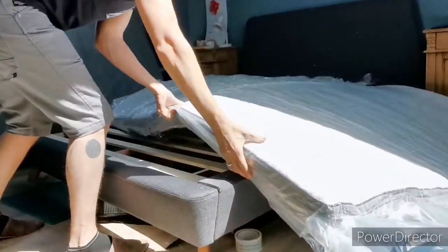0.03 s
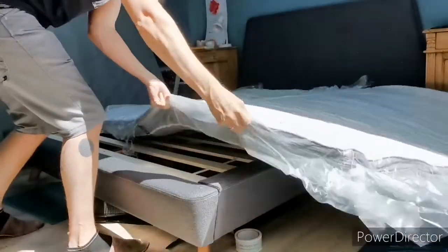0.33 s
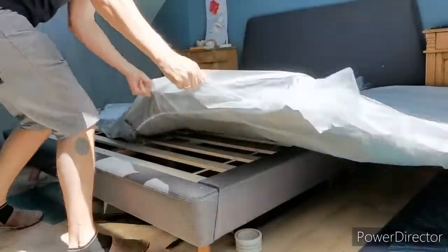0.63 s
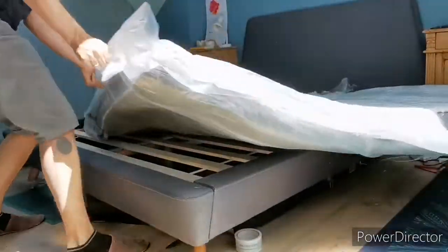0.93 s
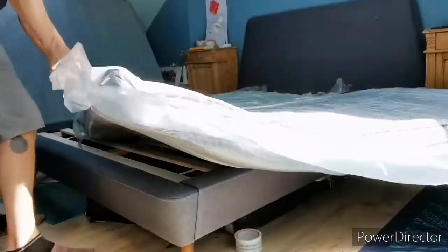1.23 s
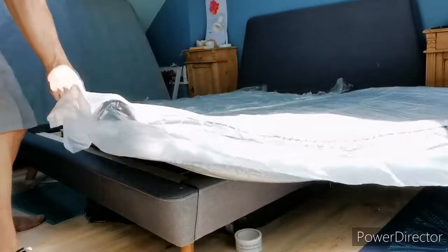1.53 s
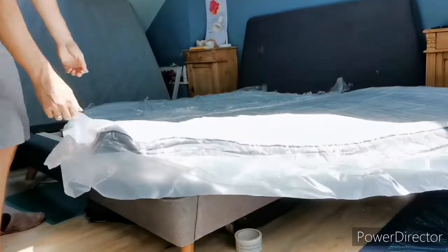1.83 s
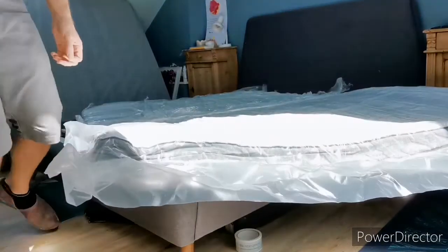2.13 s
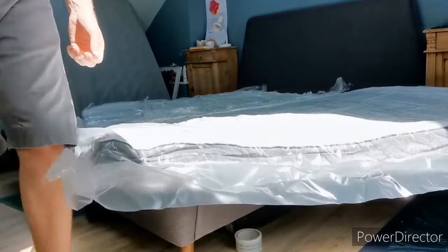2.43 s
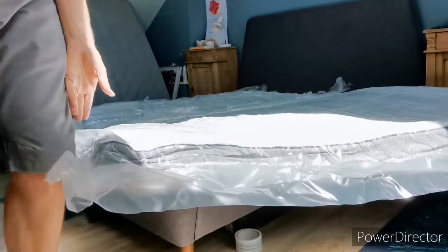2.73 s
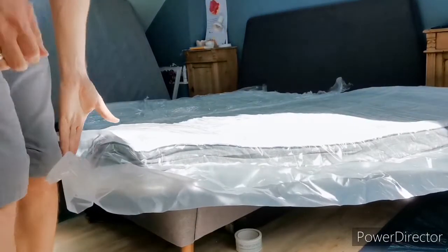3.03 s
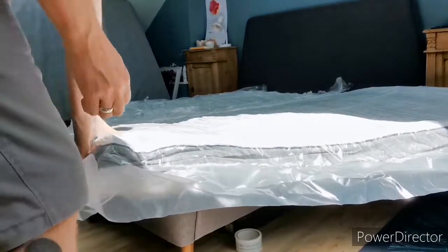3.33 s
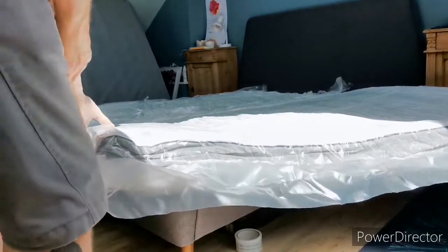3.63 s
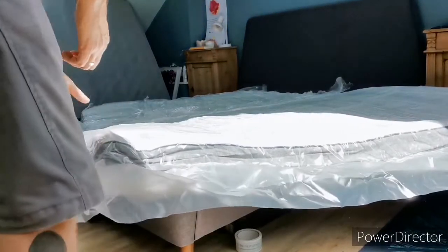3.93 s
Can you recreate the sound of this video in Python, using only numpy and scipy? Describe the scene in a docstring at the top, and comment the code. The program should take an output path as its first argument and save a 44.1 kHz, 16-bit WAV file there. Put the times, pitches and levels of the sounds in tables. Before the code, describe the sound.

Plastic crinkles and scrapes as a wrapped mattress is dragged, dropped with a thud and nudged.

```python
"""Loose plastic crinkles and scrapes: a mattress in its bag is dragged across a slatted bed frame.
The plastic crinkles in thousands of tiny buckles, snaps as big creases flip and groans as it rubs,
while the slats judder under the load. The mattress drops with a thud after about a second, then is
nudged into place with soft swishes as feet shift on the floor.
The room is a small, quiet bedroom, heard by a phone with two microphones."""
import sys
import numpy as np
from scipy import signal
from scipy.fft import rfft, irfft
from scipy.io import wavfile
from scipy.ndimage import uniform_filter1d, map_coordinates

SR = 44100
rng = np.random.default_rng(int(sys.argv[2]) if len(sys.argv) > 2 else 0)


def store_wav(level_fs):
    """Save 16-bit WAV to argv[1]."""
    pcm = np.round(np.clip(np.atleast_2d(level_fs), -1, 1) * 32767)
    wavfile.write(sys.argv[1], SR, pcm.T.astype(np.int16))


N = 176400
T = np.arange(N) / SR
TOP_HZ = 15800  # the highest pitch the phone picks up


def undb(db):
    """Turn decibels into a number to multiply by."""
    return 10 ** (np.asarray(db) / 20)


def unit(x):
    """Scale to an average strength (rms) of 1."""
    return x / np.sqrt(np.mean(x ** 2) + 1e-20)


def unit_energy(x):
    """Scale to a total energy of 1."""
    return x / np.sqrt(np.sum(x ** 2, axis=-1, keepdims=True) + 1e-20)


def curve(rows, column=1):
    """One column of a table, joined by straight lines in time."""
    rows = np.array(rows)
    return np.interp(T, rows[:, 0], rows[:, column])


def bell(middle, half_s):
    """A smooth swell and fade."""
    return np.exp(-.5 * ((T - middle) / half_s) ** 2)


def at_hz(points, hz):
    """Read between (frequency, value) points, giving each octave equal room."""
    points = np.array(points, float)
    return np.interp(np.log(np.maximum(hz, 1)), np.log(points[:, 0]), points[:, 1])


def shape(x, db_of, size=8192):
    """Turn each frequency up or down by db_of(frequency) decibels."""
    cepstrum = irfft(np.log(undb(db_of(np.fft.rfftfreq(size, 1 / SR)))))
    cepstrum[1:size // 2] *= 2  # folded so the filter rings after a sound, never before
    cepstrum[size // 2 + 1:] = 0
    return signal.fftconvolve(x, irfft(np.exp(rfft(cepstrum))))[:len(x)]


def colour(x, points):
    """Give a sound the tone drawn by (frequency [Hz], level [dB]) points."""
    return shape(x, lambda hz: at_hz(points, hz))


def add(out, start, x):
    """Mix a sound in at a time in seconds."""
    i = int(start * SR)
    out[i:i + len(x)] += x[:N - i]


def clicks(per_s, spread_db):
    """Random clicks; the wider the spread, the more a few stand out."""
    size = undb(spread_db * np.minimum(rng.exponential(size=N), 4.5))
    return (rng.random(N) < per_s / SR) * size * rng.choice([-1, 1], N)


# swishes as the bag settles and is handled
# (time [s], half length [s], treble [dB], mids [dB], scrape [dB])
SWISHES = [(1.644, 0.093, -59, -53, -55.5), (1.704, 0.037, -42.5, -46.5, -58),
           (1.827, 0.052, -54.5, -53.5, -56.5), (1.983, 0.051, -50, -55, -56), (2.36, 0.03, -58, -68, -62),
           (2.491, 0.029, -47, -58, -53.5), (2.606, 0.033, -51.5, -50.5, -53.5),
           (3.179, 0.015, -54.5, -61, -52), (3.415, 0.15, -56, -59, -62.5), (3.544, 0.052, -52.5, -52, -51),
           (3.589, 0.026, -48.5, -46.5, -47.5), (3.717, 0.046, -51, -50.5, -51.5),
           (3.832, 0.062, -63, -54.5, -54.5), (3.983, 0.049, -59.5, -63, -58)]


def motion(drag, column, swish_column, swish_db=0, release_s=0.042):
    """How strong one layer is over time: the long drag dies away, then short swishes follow."""
    dragged = undb(curve(drag, column)) * np.exp(-np.maximum(T - drag[-1][0], 0) / release_s)
    swish_power = sum((undb(row[swish_column] + swish_db) * bell(row[0], row[1])) ** 2 for row in SWISHES)
    return np.sqrt(dragged ** 2 + swish_power)


def buckles(per_s, spread_db, decay_s=0.00015, size=48):
    """Tiny buckles in the plastic, each a very short ring at its own pitch."""
    hits, hz = clicks(per_s, spread_db), rng.random(N) * SR / 2
    starts, age = np.flatnonzero(hits)[:, None], np.arange(size)
    rings = hits[starts] * np.exp(-age / SR / decay_s) * np.cos(2 * np.pi * hz[starts] * age / SR)
    return np.bincount((starts + age).ravel(), rings.ravel(), N + size)[:N]


# how loudly the bag crinkles during the drag (time [s], treble [dB], mids [dB])
DRAG_CRINKLE = [(0.0, -38, -42), (0.052, -41.5, -44.5), (0.186, -35.5, -38.5), (0.342, -37, -39),
                (0.404, -34.5, -34.5), (0.486, -45, -52), (0.635, -36, -35.5), (0.72, -36.5, -37.5),
                (0.78, -43.5, -50), (0.95, -41, -47), (1.12, -32.5, -32.5), (1.202, -47.5, -48.5),
                (1.26, -42, -42.5), (1.312, -51, -57), (1.342, -39, -39), (1.468, -37, -37),
                (1.56, -60.5, -99)]
# tone of the small buckles and of the larger ones (frequency [Hz], level [dB])
SMALL_BUCKLE_TONE = [(1500, -16.5), (3000, -5), (4300, 1), (5800, -0.5), (7000, 1.5), (7900, -3),
                     (9500, -2.5), (10800, 0), (12000, -5), (13900, -6), (15500, -7)]
LARGE_BUCKLE_TONE = [(500, -16.5), (1100, -1), (1500, -2.5), (2000, 3), (2800, 1), (3600, -4.5),
                     (6000, -30)]
# the crinkle is duller while the mattress lands (time [s], top octave boost [dB])
BRIGHTNESS = [(0.3, 4), (1.1, -3), (1.9, 0.5)]


def crinkle(drag_per_s=5000, settle_per_s=1200):
    """The plastic buckles: small bright ticks, which thin out after the drag, and larger papery ones."""
    per_s = np.where(T < DRAG_CRINKLE[-1][0], drag_per_s, settle_per_s)
    small = unit(colour(buckles(per_s, spread_db=3) / np.sqrt(per_s), SMALL_BUCKLE_TONE))
    top_octave = signal.sosfiltfilt(signal.butter(4, TOP_HZ / 2, "high", fs=SR, output="sos"), small)
    small = small + top_octave * (undb(curve(BRIGHTNESS)) - 1)
    small *= motion(DRAG_CRINKLE, column=1, swish_column=2) + undb(-62.5)  # never quite still
    large = unit(colour(clicks(per_s=2200, spread_db=4), LARGE_BUCKLE_TONE))
    return small + large * motion(DRAG_CRINKLE, column=2, swish_column=3)


# the bag sliding on the frame and under the hands (time [s], level [dB])
DRAG_SCRAPE = [(0.0, -36.5), (0.378, -39), (0.456, -46.5), (0.708, -41.5), (0.842, -52.5), (1.128, -43.5),
               (1.324, -47), (1.464, -35.5), (1.512, -61)]
# tone of the scraping (frequency [Hz], level [dB])
SCRAPE_TONE = [(120, -21), (300, -13.5), (430, 1), (600, -1), (820, -2), (1100, -4.5), (1500, -15),
               (4000, -44)]


def scrape():
    """The bag sticks and slips, drumming on the tight plastic."""
    slips = unit(colour(clicks(per_s=700, spread_db=0.5), SCRAPE_TONE))
    return slips * motion(DRAG_SCRAPE, column=1, swish_column=4)


# the slats shaking under the load (time [s], level [dB])
DRAG_JUDDER = [(0.0, -47), (0.59, -49.5), (0.82, -61.5), (1.045, -38), (1.082, -35.5), (1.15, -35.5),
               (1.312, -37.5), (1.402, -58.5), (1.56, -72)]
# the dull tone of the wooden frame (frequency [Hz], level [dB])
FRAME_TONE = [(25, -33), (90, -2.5), (290, 3), (400, -10.5), (900, -44)]
# the notes the frame rings at (pitch [Hz], width [Hz], level [dB])
FRAME_NOTES = [(60.4, 3.7, 14.5), (133, 11.5, 6.5), (205.6, 47, 1.5), (270, 18, 9.5), (357, 22, -11)]


def judder():
    """The load gives the slats many small, dull knocks that set the frame ringing."""
    knocks = clicks(per_s=290, spread_db=0)
    rings = sum(undb(db) * signal.lfilter(*signal.iirpeak(hz, hz / width, fs=SR), knocks)
                for hz, width, db in FRAME_NOTES)
    wood = unit(colour(knocks, FRAME_TONE) + rings)
    return wood * motion(DRAG_JUDDER, column=1, swish_column=4, swish_db=-6)


# tone of the background hush (frequency [Hz], level [dB])
AIR_TONE = [(20, 4), (130, -13.5), (400, -20), (1000, -21), (3000, -26.5), (10000, -54), (16000, -23)]


def house_air(level_db=-57.5):
    """The faint, steady air of the house, partly the same at both microphones."""
    shared = rng.standard_normal(N)
    return undb(level_db) * np.array([unit(colour(shared + rng.standard_normal(N), AIR_TONE))
                                      for _ in range(2)])


# groans and one thin squeak of rubbed plastic (time [s], half length [s], pitch [Hz], level [dB])
GROANS = [(0.178, 0.015, 813, -33), (0.207, 0.023, 575, -35.5), (0.347, 0.015, 670, -31),
          (0.553, 0.022, 428.5, -40.5), (2.998, 0.03, 11750, -63)]


def groans(sag=0.07, roughness=0.017, flutter_s=0.0017):
    """The slipping locks into a wobbly note whose pitch rises and falls with its strength."""
    out = np.zeros(N)
    for middle, half_s, hz, db in GROANS:
        grip = bell(middle, half_s)
        flutter = unit(uniform_filter1d(rng.standard_normal(N), int(flutter_s * SR) + 1))
        pitch = hz * (1 - sag * (1 - grip) + roughness * flutter)
        out += undb(db) * grip * unit(np.sin(2 * np.pi * np.cumsum(pitch) / SR))
    return out


# big creases flipping (time [s], level [dB], treble boost [dB], body boost [dB], fade time [ms])
CREASES = [(0.2712, -32, 6, -5, 0.15), (0.326, -40, -3, -16, 0.2), (0.3959, -23, -2.5, -9, 3.7),
           (0.516, -32, 2, -6, 0.8), (0.6872, -20, -3.5, -13, 0.44), (0.6973, -31, 1, -5, 0.27),
           (0.8492, -30, -2.5, -6, 0.5), (1.7018, -27, 0, -32, 0.4), (1.7034, -35.5, 11, -19, 0.2),
           (1.7209, -26, 5.5, -5, 0.25), (1.7688, -39.5, -2, 0.5, 0.58), (2.0470, -31.5, -7, -8, 3.3),
           (2.2191, -33, 0.5, -8.5, 0.84), (2.2760, -36.5, -5, -6.5, 12), (2.5150, -29, 3.5, -1, 2.6),
           (2.7753, -48, 4.5, -3, 2), (2.8395, -26.5, -5, -6, 2.4), (3.174, -35.5, -23, 3.5, 22),
           (3.2870, -36.5, -2.5, -1.5, 9.1), (3.488, -38.5, -2.5, -11, 10), (3.5747, -38, -1, -4, 16),
           (3.6010, -34.5, -4.5, -8, 11), (3.7600, -25, -6.5, -4, 7), (3.8993, -42, -2.5, 4.5, 2.9)]


def snaps(tick_s=0.0001, tick_db=-4, size=6000):
    """A crease flips with a sharp tick and sets off a short run of smaller ones."""
    out, t = np.zeros(N), np.arange(size) / SR
    for start, db, top_db, body_db, fade_ms in CREASES:
        tick_noise, run_noise, unevenness = rng.standard_normal((3, size))
        tick = unit_energy(tick_noise * np.exp(-t / tick_s))
        run = unit_energy(run_noise * np.abs(unevenness) * np.exp(-t * 1000 / max(fade_ms, .2)))
        burst = unit_energy(undb(tick_db) * tick + run) * np.sqrt(SR / 100)  # as strong as 10 ms at rms 1
        body = [(100, body_db - 19), (500, body_db - 2), (2200, body_db), (3400, body_db + 2)]
        top = [(8200, top_db - 2.5), (10800, top_db - 0.5), (13800, top_db - 10)]
        add(out, start, undb(db) * colour(burst, body + [(4600, 0.0048), (7000, 0.0057)] + top))
    return out


# soft, heavy bumps of mattress and feet (time [s], level [dB], rise [s], fade [s], pitch [Hz])
BUMPS = [(0.441, -43.5, 0.043, 0.064, 85), (1.06, -23.5, 0.018, 0.043, 180),
         (1.073, -25.5, 0.019, 0.055, 58), (2.494, -53, 0.0038, 0.017, 270), (2.68, -48, 0.044, 0.056, 42),
         (3.298, -43, 0.0085, 0.038, 71), (3.302, -43.5, 0.0041, 0.026, 250),
         (3.305, -38, 0.0029, 0.0075, 880)]


def thuds():
    """Padded blows: each is a band of noise, about an octave wide, that swells and dies away."""
    out, t = np.zeros(N), T[:SR]
    for start, db, rise_s, fade_s, hz in BUMPS:
        octave = signal.butter(2, [hz / np.sqrt(2), hz * np.sqrt(2)], "band", fs=SR, output="sos")
        swing = signal.hilbert(unit(signal.sosfilt(octave, rng.standard_normal(N))))
        steady = unit(swing.real / np.sqrt(np.abs(swing) ** 2 + .5))[SR:2 * SR]  # evens out the loudness
        swell = np.minimum(t / rise_s, 1) * np.exp(-np.maximum(t - rise_s, 0) / fade_s)
        add(out, start, undb(db) * steady * swell)
    return out


# steps that set the floor swaying (time [s], level [dB])
STEPS = [(2.711, -39.5), (3.29, -35.5)]


def floor_sway(hz=15, rise_s=0.069):
    """The floor bounces slowly under a step, more felt than heard."""
    out = np.zeros(N)
    bounce = T / rise_s * np.exp(1 - T / rise_s) * np.sin(2 * np.pi * hz * T)
    for start, db in STEPS:
        add(out, start, undb(db) * bounce)
    return out


# how long the bedroom echoes (frequency [Hz], time to fade by 60 dB [s])
ECHO_TIMES = [(150, 0.44), (1000, 0.17), (4000, 0.23), (12000, 0.19)]
EARLY_DB = -3.5  # the first echoes, compared with the tail


def echoes(early_s=0.009, alike_below_hz=580, size=12000):
    """One spot's first echoes and short tail; the bass is alike at both microphones."""
    t, hz = T[:size], np.fft.rfftfreq(size, 1 / SR)
    noise = rfft(rng.standard_normal((3, size)))
    alike = 1 / (1 + (hz / alike_below_hz) ** 2)
    pair = np.sqrt(alike) * noise[2] + np.sqrt(1 - alike) * noise[:2]
    tail = 0
    for band_hz, fade_s in ECHO_TIMES:
        share = at_hz([(f, f == band_hz) for f, _ in ECHO_TIMES], hz)
        tail = tail + irfft(pair * share, size) * unit_energy(undb(-60 * t / fade_s))
    early = irfft(pair, size)[:, ::-1] * unit_energy(np.exp(-t / early_s))
    return (tail + undb(EARLY_DB) * early) * (t > .0012)  # the first echo takes 1.2 ms to arrive


# where the sound comes from (time [s], delay at the left microphone [ms])
DIRECTION = [(0.3, 0.022), (1.2, 0.17), (2.3, 0.094), (2.7, -0.19), (3.6, -0.16)]


def room(x, echo_db, spots, beam_db=0, hop_s=0.008, blend_s=0.0037):
    """Direct sound, its treble beamed at the phone, plus echoes that hop among several spots."""
    beamed = colour(x, [(TOP_HZ / 2 / np.sqrt(2), 0), (TOP_HZ / np.sqrt(2), beam_db)])
    left = map_coordinates(beamed, [(T - curve(DIRECTION) / 1000) * SR], mode="nearest")
    direct = np.array([left, beamed])
    spot = rng.integers(0, spots, N)[(T / hop_s).astype(int)]
    echo = 0
    for k in range(spots):
        here = np.sqrt(np.abs(uniform_filter1d(1. * (spot == k), int(blend_s * SR) + 1)))
        echo = echo + signal.fftconvolve((x * here)[None], echoes(), axes=1)[:, :N]
    total_power = 1 + undb(echo_db) ** 2 * (1 + undb(EARLY_DB) ** 2)
    return (direct + undb(echo_db) * echo) / np.sqrt(total_power)


def scene():
    """Plastic, frame and feet in the bedroom; the big creases face the phone and sound crisper."""
    bag = room(crinkle() + scrape() + groans(), echo_db=4.5, spots=8, beam_db=2)
    creases = room(snaps(), echo_db=5, spots=3, beam_db=4.5)
    knocks = room(judder() + thuds(), echo_db=-7, spots=3)
    return bag + creases + knocks + floor_sway() + house_air()


# how the two microphones share the sound (frequency [Hz], left minus right [dB])
MIC_BALANCE = [(30, -4), (120, -2.5), (260, -1), (550, 3), (1100, 1), (2600, 3), (4000, -2), (5800, -0.5),
               (7200, -10.5), (8600, 14), (11000, 14), (13000, 7.5), (16000, 8)]


def record(dry):
    """Each microphone has its own tone, and the highest treble is cut off."""
    def microphone(x, side):
        return shape(x, lambda hz: 10 * np.log10(2 / (1 + undb(-side * at_hz(MIC_BALANCE, hz)) ** 2)))
    heard = np.array([microphone(dry[0], 1), microphone(dry[1], -1)])
    return signal.sosfilt(signal.ellip(10, .2, 80, TOP_HZ, fs=SR, output="sos"), heard)


dry = scene()
out = record(dry)
store_wav(out)
```